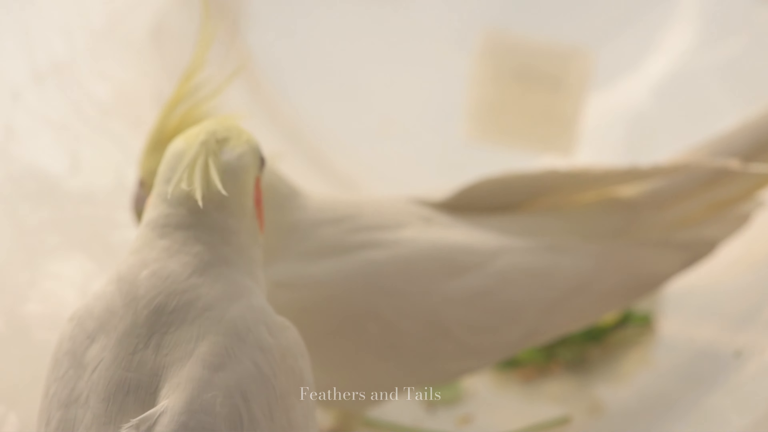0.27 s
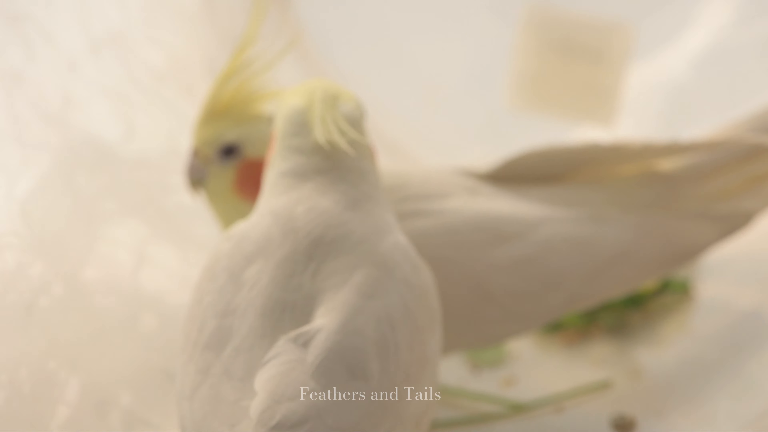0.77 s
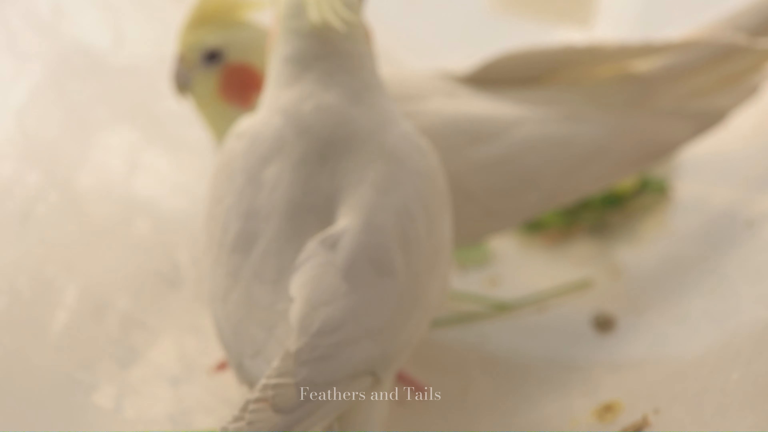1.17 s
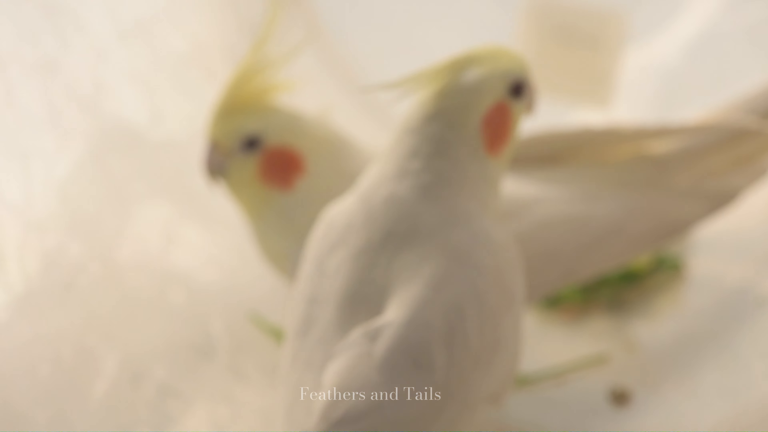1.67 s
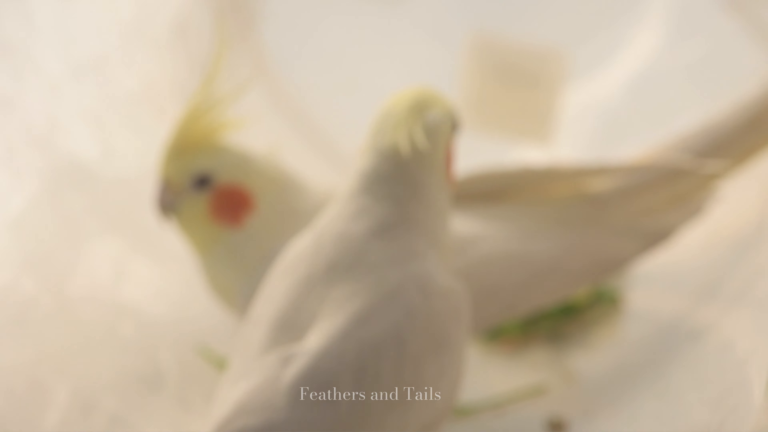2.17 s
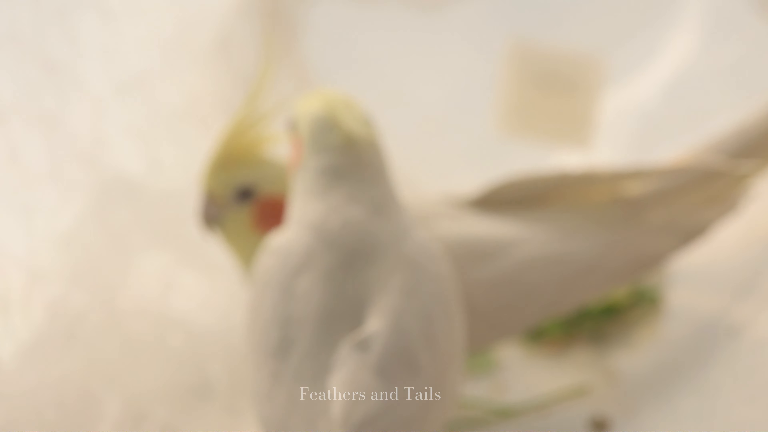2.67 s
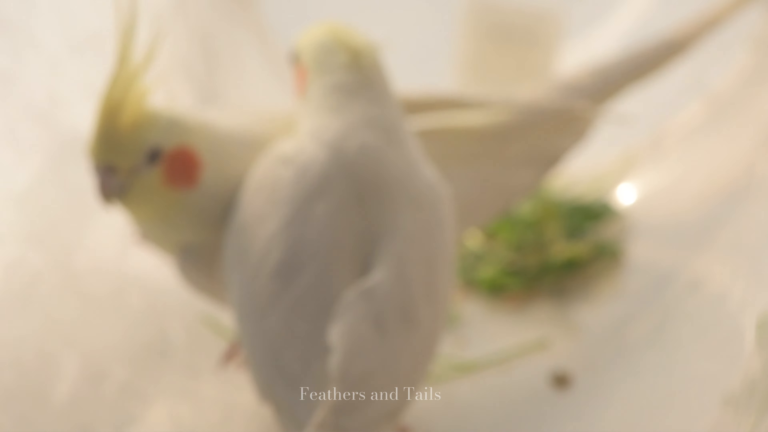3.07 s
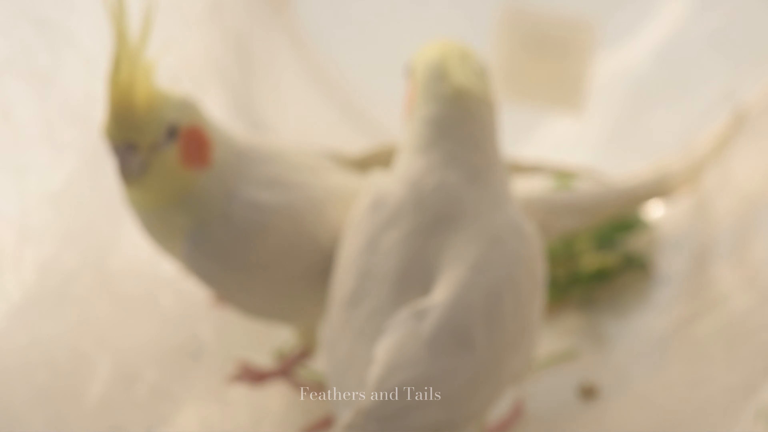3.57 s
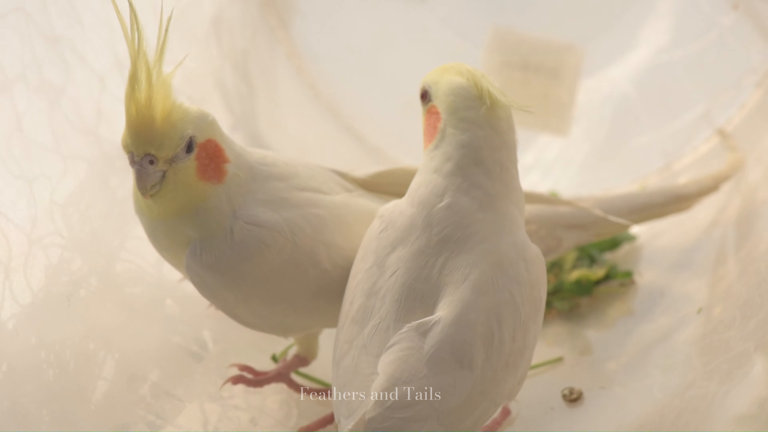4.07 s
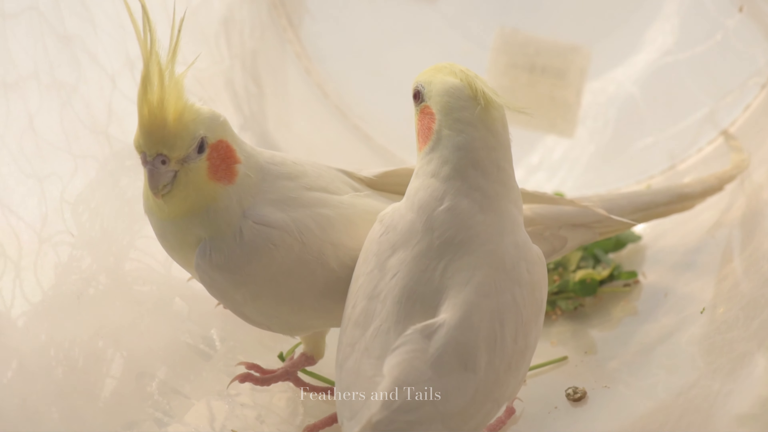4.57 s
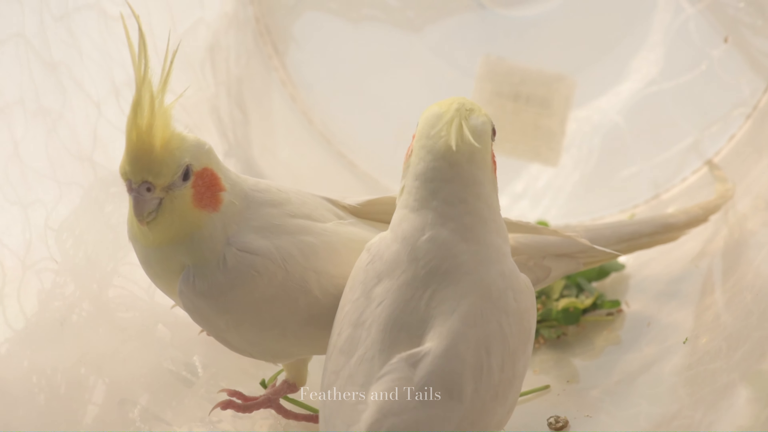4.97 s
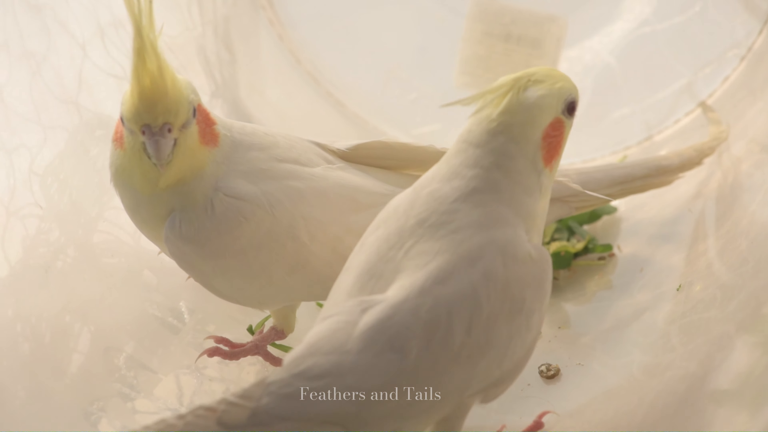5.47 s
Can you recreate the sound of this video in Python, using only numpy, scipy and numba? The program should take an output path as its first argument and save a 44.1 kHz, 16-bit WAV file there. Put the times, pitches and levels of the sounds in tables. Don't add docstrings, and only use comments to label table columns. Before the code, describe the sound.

Two small parrots chatter near the microphones, each note clipped and followed by a short bright room ring. Loud clear whistles dominate around two seconds, lower squawks and trembling notes follow, then a lull with faint claw clicks and one far peep. Softer calls return at the end beside crisp beak clicks; a faint unsteady appliance hum runs throughout.

```python
import sys
import numpy as np
from scipy import signal
from scipy.fft import rfft, irfft, next_fast_len
from scipy.io import wavfile
from scipy.ndimage import uniform_filter1d, map_coordinates
from numba import njit

SR = 44100
rng = np.random.default_rng(int(sys.argv[2]) if len(sys.argv) > 2 else 0)


def attenuation_scalar(level_db):
    decades = np.asarray(level_db, float) / 20
    return 10 ** decades


def digitize_waveform(pressure):
    field = np.atleast_2d(pressure).T
    bounded = np.clip(field, -1, 1)
    quanta = np.round(bounded * 32767).astype(np.int16)
    wavfile.write(sys.argv[1], SR, quanta)


N = 252252

# time in seconds, pitch in Hz, level in dB.
WHISTLES = [
    [(1.612, 3440, -37), (1.63, 3140, -16), (1.647, 2830, -13), (1.657, 2840, -16)],
    [(2.318, 1986, -33), (2.33, 2355, -25.5), (2.339, 2024, -33), (2.347, 2440, -25.5), (2.352, 2950, -35),
     (2.361, 2900, -41), (2.371, 3130, -22)],
    [(2.373, 3044, -14.5), (2.385, 2920, -16), (2.405, 2829, -6), (2.417, 2881, -12), (2.422, 2754, -27),
     (2.428, 2916, -15), (2.436, 2900, -24)],
    [(2.57, 2960, -37), (2.585, 3480, -23.5), (2.625, 3660, -58)],
    [(5.283, 1595, -26.5), (5.295, 1790, -18.5), (5.315, 1910, -21), (5.336, 1894, -19.5),
     (5.345, 1900, -30)],
]
# time in seconds, pitch in Hz, level in dB, gape in dB.
LONG_WHISTLE = [
    (1.897, 2200, -21, -29),
    (1.906, 2350, -17.5, -46),
    (1.916, 2606, -5, -31.5),
    (1.977, 2629, -8, -15.5),
    (1.987, 2330, -12, -26),
    (1.991, 2600, -17.5, -22),
    (2.004, 2615, -14, -28),
    (2.047, 2612, -21, -24),
    (2.072, 2612, -28.5, -28),
]
# time in seconds, pitch in Hz, level in dB, gape in dB, lift of the upper partials in dB.
TUMBLES = [
    [(.243, 1984, -36, 21, 12), (.252, 2860, -11.5, -24, 4), (.26, 2640, -15.5, 10, -26),
     (.274, 1945, -8.5, -4.5, -2), (.288, 2408, -7, -5, -13), (.3, 2207, -19, -13, -16),
     (.309, 1752, -15.5, -2, -2), (.318, 2006, -17, -12, -17), (.334, 1995, -7.5, -25, -15)],
    [(1.234, 1930, -10, 15, 5), (1.239, 2517, -11.5, -3, 14.5), (1.246, 2527, -5.5, -4.5, 6),
     (1.265, 2343, -10.5, -41, -10), (1.28, 1622, -19.5, -27, -6), (1.3, 1807, -20, -18, -2),
     (1.312, 1300, -23.5, -54, 4), (1.325, 1950, -18, -35, 0)],
    [(5.346, 1890, -30, -40, 2), (5.353, 1956, -15, -38, -5), (5.362, 2040, -26.5, -25, 1.5),
     (5.385, 2218, -17, -17, 1), (5.4, 2345, -8, -29, 0), (5.416, 2345, -6.5, -27, 0),
     (5.422, 2200, -17.5, -24, -1), (5.436, 1603, -20, -13, -10), (5.446, 1080, -28, 1, -12)],
]
# time in seconds, pitch in Hz, level in dB, gape in dB.
FALLS = [
    [(.72, 1225, -22.5, -4), (.728, 1227, -19.5, -8), (.744, 1192, -27, -26), (.752, 1170, -27, -26)],
    [(.336, 1817, -32, -4), (.355, 1575, -22.5, -37), (.368, 1267, -26.5, -30), (.385, 1375, -26, -48),
     (.408, 1123, -22, 4)],
    [(1.336, 1785, -18, -33), (1.345, 1843, -12.5, 3), (1.363, 1690, -12.5, 13), (1.37, 1260, -25.5, 16)],
    [(1.469, 2490, -7, -18), (1.49, 2110, -10.5, -12), (1.51, 1257, -21.5, -16), (1.522, 1075, -33, -11)],
    [(1.865, 1627, -23, -45), (1.875, 1218, -50, 4), (1.89, 1260, -29, -7)],
    [(2.187, 2122, -11, 8.5), (2.205, 2159, -18, -5), (2.226, 2054, -6.5, -26), (2.233, 1924, -19, -17),
     (2.246, 1794, -24, -19)],
    [(5.468, 1174, -22, 0), (5.478, 1346, -18.5, -3.5), (5.535, 1252, -30.5, -18)],
]
# time in seconds, pitch in Hz, level in dB, gape in dB.
ARCHES = [
    [(1.752, 1184, -27.5, 10), (1.765, 1254, -14, 8), (1.78, 1502, -19.5, 12), (1.81, 1646, -21, -50),
     (1.835, 1310, -19.5, -65), (1.853, 1410, -23, -55)],
    [(2.52, 1197, -32, -9), (2.535, 1230, -18, 13), (2.55, 1473, -17.5, -6), (2.6, 1264, -20, -59),
     (2.628, 1374, -22, -18), (2.64, 1486, -11, 12.5), (2.652, 1307, -19.5, 17)],
    [(3.492, 1473, -22, 8), (3.505, 1713, -13, 0.5), (3.522, 1662, -13, 11), (3.53, 1240, -16.5, 14)],
    [(5.648, 1302, -29.5, -10), (5.665, 1347, -26.5, -18), (5.69, 1493, -27, -40), (5.705, 1514, -22.5, 10),
     (5.72, 1400, -13, 17)],
]
# time in seconds, pitch in Hz, level in dB, gape in dB, perhaps lift of the upper partials in dB.
SQUAWKS = [
    [(1.05, 1807, -26.5, -8, -2), (1.07, 1970, -22, -13, 3), (1.1, 2071, -16.5, -3, 3.5),
     (1.14, 2118, -13, -1, -1), (1.15, 2137, -20, 14, -5), (1.157, 2450, -10, 4, -4),
     (1.168, 2280, -26, 20, -21)],
    [(2.712, 1316, -28, 3.3), (2.726, 1484, -9, 13), (2.736, 1330, -29, 22)],
    [(3.129, 1784, -28, -22), (3.145, 1864, -16.5, -9), (3.17, 2010, -11, -13), (3.2, 1868, -13.5, -9),
     (3.212, 1855, -14.5, 4), (3.217, 1720, -8, 6), (3.224, 1670, -25, 7)],
    [(3.293, 1268, -23, 21, -2), (3.304, 1300, -34, 6, 10), (3.309, 1357, -15.5, 8, 4),
     (3.315, 1450, -16.5, 13, 2), (3.322, 1410, -18, -4, -3)],
    [(3.598, 1240, -36, 15), (3.612, 1338, -19.5, 9.7), (3.622, 1336, -16.5, 9.2)],
]
# time in seconds, centre pitch in Hz, level in dB, gape in dB.
WARBLED = [
    [(3.3225, 1448, -16, 13), (3.331, 1692, -13.5, 7.5), (3.345, 1758, -18.5, -28), (3.36, 1581, -21, -35),
     (3.46, 1658, -18.5, -30), (3.478, 1428, -24, -16), (3.488, 1620, -14, -42)],
    [(3.625, 1288, -18, 9), (3.635, 1405, -10, 13), (3.641, 1497, -25.5, 6), (3.65, 1430, -19, -22),
     (3.69, 1308, -24, -19), (3.75, 1306, -23, -11), (3.773, 1358, -17.5, -14), (3.784, 1476, -11.5, 20),
     (3.799, 1390, -11, 9.5)],
]
# time in seconds, pitch in Hz, level in dB.
FAR_PEEP = [
    (4.642, 2070, -38),
    (4.650, 2640, -40),
    (4.665, 2770, -41.5),
    (4.70, 2690, -52),
]
# left-right in dB, room in dB, breath in dB,
# upper partials against the level in dB.
MANNER = [(-8, 8, 6.5, -28), (-4.5, -7, -12.5, -7), (-6, -4.5, -5.5, -36), (-3.5, -7, -12, -29),
          (-3.5, -10.5, -15.5, -30), (6, -5, -45, -13.5), (-4.5, -3, -8.5, -15.5), (6, -2, -8, -2.5),
          (7, -3, -23, -29), (-6.5, -5, -14.5, -21.5), (3, -6, -13.5, -22.5), (-6, -6, -11.5, -30),
          (7, -6.5, -20.5, -21.5), (4.5, -5, -10, -25), (-16, -11, -23, -53), (-7, -12.5, -24, -20),
          (5.5, -4, -23, -18), (6, -3.5, -15, -14.5), (6.5, -3.5, -25, -18), (4.5, -7.5, -8, -25),
               (2, 1.5, 0.5, -32), (5, -8, -10.5, -21.5), (3.5, -8.5, -14, -31), (-4, -7, -14.5, -29),
               (3.5, -6.5, -13, -21.5), (-3.5, 3, -11.5, -17.5), (-6, -11, -1.5, -4.5),
               (3, -8.5, 1.5, -16.5), (-4, -3.5, -16, -23.5), (-3.5, -8, -15, -23.5), (-2.5, -1.5, -9, -25),
               (-3.5, -11.5, -22.5, -31), (-5, -6.5, -20, -11.5), (-5, -5, -23, -16),
               (-4.5, -9.5, -18.5, -34), (-5, 2, -16, -26.5)]
SHRILL_DB = [-4, 2, 7, -5, -1, -7.5, -6, -7, -17, 1.5, 4, 5.5, 5.5, 2.5, 0, 0, 1.5, 7, -4, 6, 1, -8, 4.5, 8,
             8, -2, -2, 1, 13, 11.5, 9, 7, -0.5, -2, 7, 2.5]


def birds():
    mix = np.zeros((2, N))
    song = short_calls() + [shut(whistle) for whistle in WHISTLES] + [LONG_WHISTLE]
    song = song + TUMBLES + FALLS + ARCHES + SQUAWKS + WARBLED
    in_time_order = sorted(song, key=min)
    for rows, manner, shrill_db in zip(in_time_order, MANNER, SHRILL_DB):
        pan_db, room_db, breath_db, harsh_db = manner
        placed(mix, note(rows, breath_db, harsh_db, shrill_db), min(rows)[0], pan_db, room_db)
    peep = note(shut(FAR_PEEP), breath_db=-10.5, harsh_db=-30, shrill_db=-2)
    placed(mix, peep, FAR_PEEP[0][0], pan_db=4.0, room_db=-5)
    return mix


SHUT_DB = -27.5


def shut(rows):
    return [(s, hz, db, SHUT_DB) for s, hz, db in rows]


# start in seconds, length in seconds, pitch in Hz, level in dB, first gape in dB.
YELPS = [
    (0.234, 0.0071, 2070, -25, -3),
    (1.014, 0.031, 1771, -13, 13.5),
    (1.224, 0.0095, 2025, -10, 17.5),
    (2.795, 0.03, 1496, -8.5, 13),
    (3.095, 0.025, 1762, -14, 18.5),
]
# start in seconds, length in seconds, pitch in Hz, rise in Hz, level in dB.
HOOTS = [
    (0.805, 0.067, 1117, 79.5, -22),
    (2.886, 0.066, 1255, 36.2, -21),
]
# start in seconds, length in seconds, first pitch in Hz, last pitch in Hz, level in dB.
FLICKS = [
    (0.931, .025, 1690, 2268, -16),
    (3.013, 0.024, 1643, 2122, -17),
]


def short_calls():
    calls = []
    for s, long, hz, db, gape_db in YELPS:
        end = (s + long, hz * (1 - 0.07), db - 400 * long, gape_db - 1001 * long)  # fades, shuts in dB a second
        calls.append([(s, hz, db, gape_db), end])
    snap_s, snap_rise = 0.0214, 0.138
    for s, long, hz, rise_hz, db in HOOTS:
        top_hz = hz + rise_hz
        snap = (s + long, top_hz * (1 + snap_rise), db + 2.5, 13)
        calls.append([(s, hz, db, SHUT_DB), (s + long - snap_s, top_hz, db, SHUT_DB), snap])
    knee_time, knee_rise = 0.69, 0.82
    for s, long, hz, last_hz, db in FLICKS:
        loud_db = db + 5.5
        knee = (s + knee_time * long, hz + knee_rise * (last_hz - hz), loud_db, -7.75)
        calls.append([(s, hz, db, -2), knee, (s + long, last_hz, loud_db, -13.5)])
    return calls


# start in seconds, end in seconds, rate in Hz, depth from 0 to 1, hiss in dB.
RASPS = [
    (1.0535, 1.150, 92, 1, -18.5),
    (3.1275, 3.23, 88, .8, -17.5),
    (4.639, 4.705, 62, 1, -60),
]
# start in seconds, end in seconds, rate in Hz, depth as a share, louder on top in dB.
WARBLES = [
    (3.328, 3.484, 35.3, .16, 1.5),
    (3.633, 3.753, 34.4, 0.11, 2),
]
# frequency in Hz, level in dB.
THROAT = [(4200, 8), (6100, 1), (7700, -2.5), (9500, -1.5), (10800, -11), (12600, -2), (14500, -9),
          (16000, 1)]
# frequency in Hz, level in dB per Hz.
BEAK = [(1000, -11.5), (2500, 2.5), (4300, -6.5), (9500, -12), (11000, -14), (13000, -9), (16000, -26)]
# frequency in Hz, level in dB per Hz.
GRATE = [(1800, -24), (3200, -13), (3950, -11), (4250, 5), (4600, -11), (9600, -13), (13000, -22)]


def note(rows, breath_db, harsh_db, shrill_db):
    s, *cols = np.transpose(sorted(rows))
    t = np.arange(s[0], s[-1], 1 / SR)
    n = len(t)
    curves = [uniform_filter1d(np.interp(t, s, c), size=130, mode="nearest") for c in cols]
    hz, db, gape_db, *lift = curves
    hz = uniform_filter1d(hz, size=110, mode="nearest")
    harsh_db = harsh_db + sum(lift)
    for start, end, rate_hz, depth, lift_db in WARBLES:
        swing = np.sin(2 * np.pi * rate_hz * (t - start))
        swing = swing * np.clip((end - t) / .004, 0, 1) * (t > start)
        hz = hz * (1 + depth * swing)
        db = db + lift_db * swing

    first_db = db - 10 * np.log10(1 + attenuation_scalar(gape_db) ** 2)
    second_db = first_db + gape_db
    upper_db = db + harsh_db + 0.31 * gape_db

    choke, grate, calm = np.zeros(n), np.zeros(n), np.ones(n)
    for start, end, rate_hz, depth, hiss_db in RASPS:
        inside = np.clip(np.minimum(t - start, end - t) / .008, 0, 1)
        closed = (.5 + .5 * np.cos(2 * np.pi * rate_hz * (t - start))) ** 2.5
        choke += inside * np.clip(depth, 0, 1) * closed
        grate += inside * attenuation_scalar(hiss_db) * (.4 + .6 * closed)
        calm -= .5 * inside

    hz = hz * (1 - 0.0628 * choke + 0.005 * wobble(n, 271.3))
    turn = 2 * np.pi * np.cumsum(hz) / SR
    ragged = 0.42 * (1 - calm) * wobble(n, 900)
    voice = attenuation_scalar(first_db) * np.sin(turn)
    voice += attenuation_scalar(second_db + 1.5 * wobble(n, 150)) * np.sin(2 * turn + 1 + 2.5 * ragged)

    shrill = [(7000, 0), (11500, shrill_db)]
    rasped_db = [0, 0, 0, 0, -7, 9] + 7 * [-15]
    for k in range(3, 13):
        level_db = upper_db - 3.5 * (k - 3)
        level_db = level_db + along(THROAT, k * hz) + along(shrill, k * hz)
        level_db = level_db + (1 - calm) * 2 * rasped_db[k] + 4.5 * wobble(n, 84.3)
        shaky = calm * attenuation_scalar(breath_db - 13) * k * wobble(n, 500)
        partial = np.sin(k * (turn + .5 * ragged) + k + shaky)
        voice += attenuation_scalar(level_db) * (k * hz < SR / 2.5) * partial

    hiss_db = breath_db + np.maximum(first_db - 7.5, second_db - 6.5)
    hiss_colour = [(f, level + along(shrill, f)) for f, level in BEAK]
    breath = calm * attenuation_scalar(hiss_db) * noise(hiss_colour, n)[0]
    air = attenuation_scalar(2.5 * wobble(n, 300)) * (breath + grate * noise(GRATE, n)[0])
    voice = np.sqrt(2) * voice * (1 - choke) * attenuation_scalar(1.3 * wobble(n, 130)) + air
    attack_s, release_s = 0.0025, 0.0016
    return voice * np.clip(np.minimum((t - s[0]) / attack_s, (s[-1] - t) / release_s), 0, 1)


# time in seconds, peak in dB, body in dB.
TICKS = [(2.088, -46, -17), (2.779, -44, -20), (2.792, -35, -17), (3.4597, -40, 4), (3.598, -48, 7),
         (4.7, -52, 1), (4.867, -52, 4), (4.8854, -65, -1), (4.8996, -48.5, 1), (4.911, -55, -8),
         (4.9244, -61, -7), (5.243, -51.5, 8), (5.296, -47, -20), (5.699, -44, -20)]
# time in seconds, peak in dB.
NIBBLES = [(5.557, -33), (5.5714, -48), (5.5786, -33), (5.59, -33), (5.6, -46), (5.609, -46), (5.634, -43),
           (5.6407, -36), (5.65, -40), (5.667, -39)]
# time in seconds, half length in seconds, level in
# dB, treble lift in dB per octave.
SCUFFS = [(0.564, 0.01, -43.5, 8), (0.646, 0.01, -27.5, -1.5), (1.444, 0.016, -31, 3.5),
          (1.872, 0.0093, -32.5, -12), (2.255, .005, -32, -11), (2.297, 0.024, -32, -11.5),
          (2.339, 0.0035, -34, -8), (2.421, .002, -26, 3.5), (2.716, 0.0034, -28, 6),
          (3.49, 0.004, -36, 10), (3.615, 0.012, -28, 0), (3.636, 0.0022, -24, -3), (3.864, 0.008, -47, 19),
          (3.944, 0.0047, -44, 27), (5.177, 0.002, -45, 18)]
# frequency in Hz, level in dB per Hz.
SCRAPE = [(410, -42.5), (700, -46), (1100, -9.5), (2430, -10), (4180, -10.5), (6840, -30.5), (7990, -23.5),
          (15500, -55)]


def feet():
    mix = np.zeros((2, N))
    t = np.arange(SR // 50) / SR
    crack_colour = [(2000, -29), (4000, 0.0), (8000, -7), (15000, -9.5)]  # Hz, dB per Hz
    for s, db, body_db in TICKS:
        crack = attenuation_scalar(-60 * t / 0.0076) * noise(crack_colour, len(t))[0]
        body = attenuation_scalar(body_db - 60 * t / 0.026) * np.sin(2 * np.pi * 1650 * t)
        placed(mix, attenuation_scalar(db + 12.0) * (crack + body), s, pan_db=3.0, room_db=-3.5)
    for s, db in NIBBLES:
        click = attenuation_scalar(db - 60 * t / 0.0045) * np.sin(2 * np.pi * 8400 * t)
        placed(mix, click, s, pan_db=11.0, room_db=-5)
    t = np.arange(-.1, .1, 1 / SR)
    for s, half, db, lift_db in SCUFFS:
        colour = [(hz, level + lift_db * np.log2(hz / 2500)) for hz, level in SCRAPE]
        grains = attenuation_scalar(1.7 * wobble(len(t), 655.0)) * noise(colour, len(t))[0]
        swell = np.exp(-(t / half) ** 2 / 2)
        placed(mix, attenuation_scalar(db) * swell * unit(grains), s + t[0], pan_db=5.0, room_db=-4.0)
    return mix


# frequency in Hz, level in dB per Hz.
AIR = [(15, -66), (25, -25), (64, -10.5), (101, -6.5), (140, -8.5), (221, -13.5), (378, -19), (647, -17.5),
       (1230, -21), (2170, -24.5), (10500, -41), (15500, -50)]
# frequency in Hz, likeness from -1 to 1.
ALIKE = [(60, 0.98), (180, 0.94), (550, 0.85), (1650, 0.4), (4970, -0.45), (15000, 0.2)]


def room_tone():
    m = next_fast_len(N)
    hz = np.fft.rfftfreq(m, 1 / SR)
    spread = np.arccos(np.clip(along(ALIKE, hz), -1, 1)) / 2
    spectra = rfft(noise(AIR, N, channels=2), m)
    mid, side = irfft(spectra * [np.cos(spread), np.sin(spread)], m)[:, :N]
    air = attenuation_scalar(-40.0 + 0.14 * wobble(N, 0.22)) * unit(np.array([mid + side, mid - side]))
    hum_hz = 99.6 + 3.07 * wobble(N, 2.3)
    hum = attenuation_scalar(-43.0 + 0.71 * wobble(N, 6.7)) * np.sin(2 * np.pi * np.cumsum(hum_hz) / SR)
    whine = attenuation_scalar(-80 + 2.5 * wobble(N, 12)) * np.sin(2 * np.pi * 9464 * np.arange(N) / SR)
    return air + hum + whine + jolt()


def jolt():
    middle_s, half_s, level_db = 2.568, 0.0034, -24
    late = (np.arange(N) / SR - middle_s) / half_s
    return attenuation_scalar(level_db) * 4 * late * np.exp(-8 * late ** 2) * [[1], [-1]]


def placed(mix, x, s, pan_db, room_db):
    m = next_fast_len(len(x) + 64)
    side = np.array([[.5], [-.5]]) * pan_db
    lead = 16 / SR
    lag = lead - side * 4e-6
    delay = np.exp(-2j * np.pi * np.fft.rfftfreq(m, 1 / SR) * lag)
    direct = irfft(rfft(x, m) * attenuation_scalar(side) * delay, m)
    add(mix, direct, s - lead)
    add(mix, attenuation_scalar(room_db) * echoes(x), s)


# frequency in Hz, time to fall by 60 dB in seconds.
ROOM = [(1000, 0.54), (3000, 0.38), (6000, 0.38), (12000, 0.34)]


def echoes(x):
    hz, t, z = signal.stft(rng.standard_normal((2, SR * 3 // 5)), SR, nperseg=256)
    decay = attenuation_scalar(-60 * t / along(ROOM, hz)[:, None])
    tail = signal.istft(z * decay, SR, nperseg=256)[1]
    tail = tail * np.clip(np.arange(tail.shape[1]) / SR / .012, 0, 1)
    return signal.fftconvolve(x[None], tail / np.linalg.norm(tail[0]), axes=1)


def add(mix, x, s):
    space = mix[:, round(s * SR):][:, :x.shape[1]]
    space += x[:, :space.shape[1]]


def noise(spectrum, n, channels=1):
    m = next_fast_len(n + 8192)
    gain = attenuation_scalar(along(spectrum, np.fft.rfftfreq(m, 1 / SR)))
    white = rng.standard_normal((channels, m))
    return unit(irfft(rfft(white) * gain, m)[:, :n])


def wobble(n, rate):
    knots = rng.standard_normal(int(n * rate / SR) + 4)
    return map_coordinates(knots, [np.arange(n) * rate / SR])


def along(points, hz):
    f, v = np.transpose(points)
    return np.interp(np.log(hz + 1), np.log(f + 1), v)


def unit(x):
    return x / np.sqrt(np.mean(x ** 2) + 1e-20)


def scene():
    return birds() + feet() + room_tone()


@njit
def follow(level, attack, release):
    held, now = np.empty_like(level), 0.
    for i in range(len(level)):
        speed = attack if level[i] > now else release
        now += speed * (level[i] - now)
        held[i] = now
    return held


def top_cut(x):
    return signal.sosfilt(signal.butter(12, 15610, fs=SR, output="sos"), x)


def record(dry):
    attack_s, release_s = .0015, .016
    level = follow(np.abs(dry).max(axis=0), 1 / (attack_s * SR), 1 / (release_s * SR))
    ducked = dry * np.minimum(1, attenuation_scalar(-7.5) / (level + 1e-9)) ** .9
    rounded = ducked / (1 + np.abs(ducked / .9) ** 6) ** (1 / 6)
    treble_cut = signal.cheby2(12, 50, 16000, fs=SR, output="sos")
    finished = signal.sosfiltfilt(treble_cut, rounded)
    return top_cut(finished)


dry = scene()
out = record(dry)
digitize_waveform(out)
```